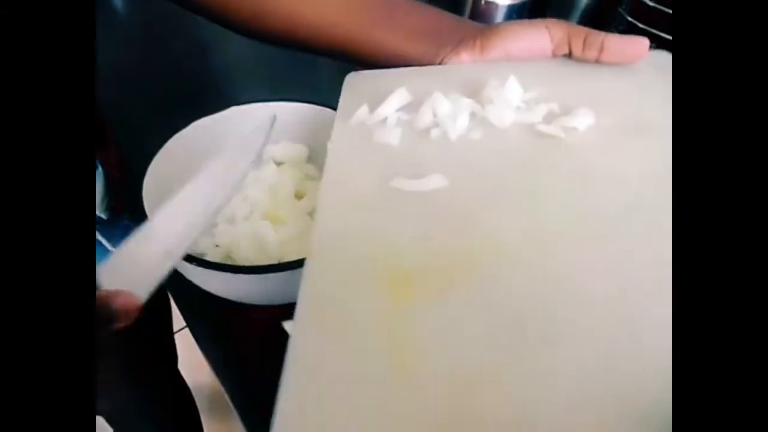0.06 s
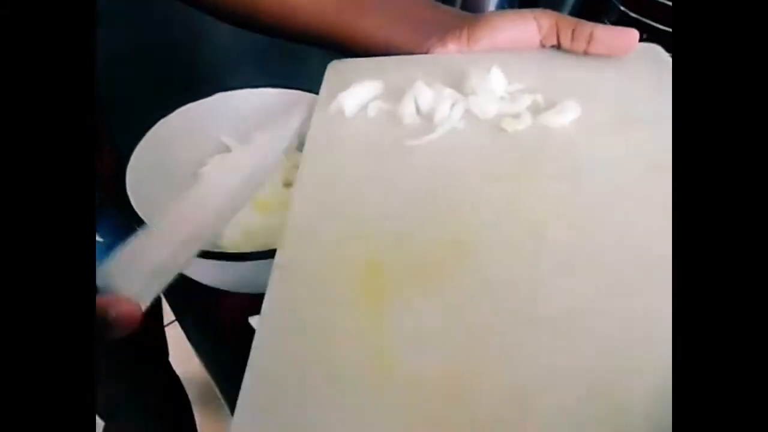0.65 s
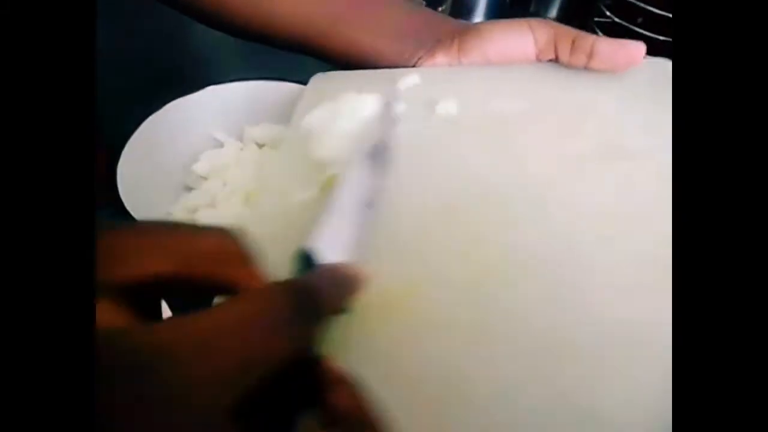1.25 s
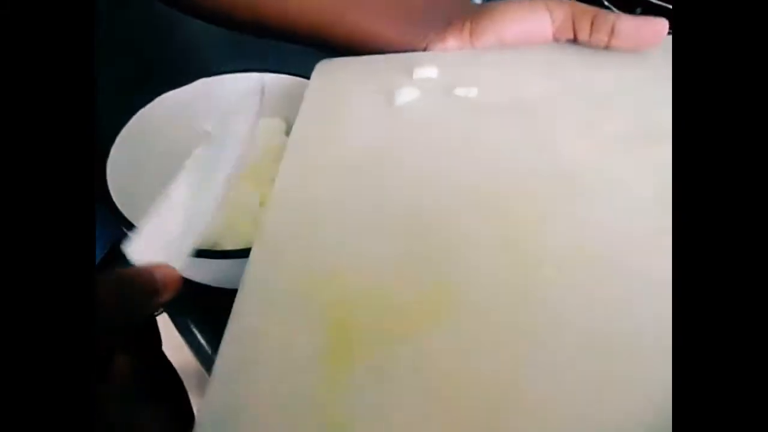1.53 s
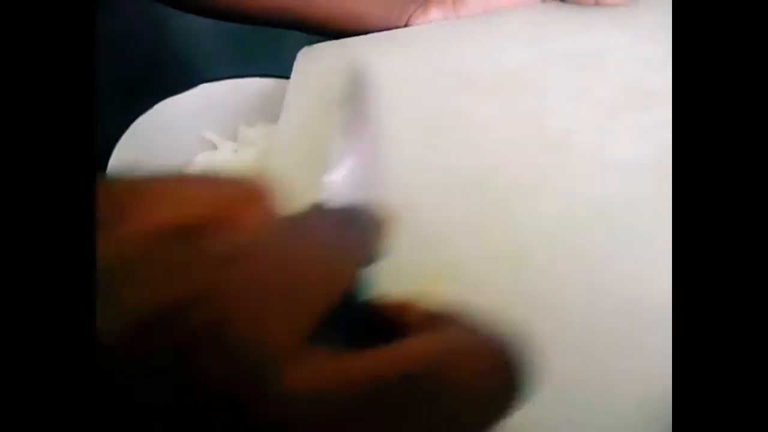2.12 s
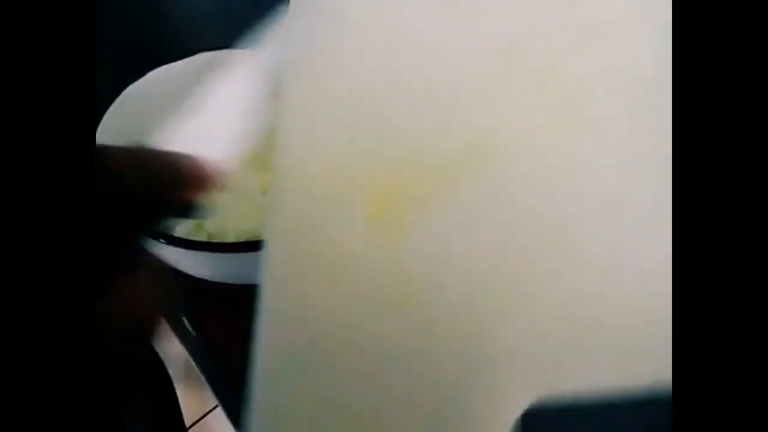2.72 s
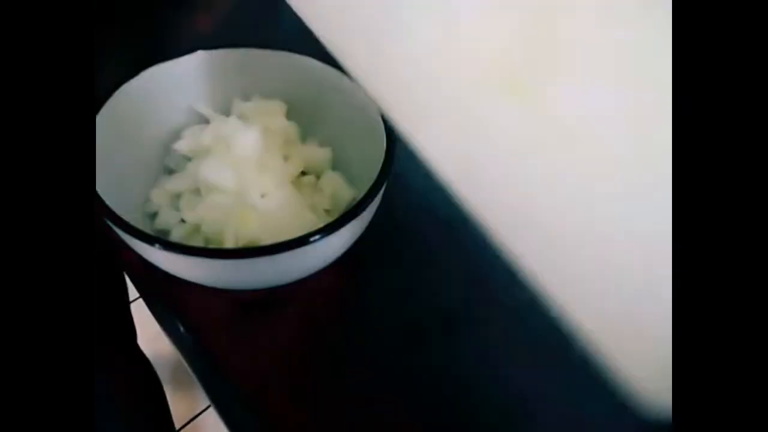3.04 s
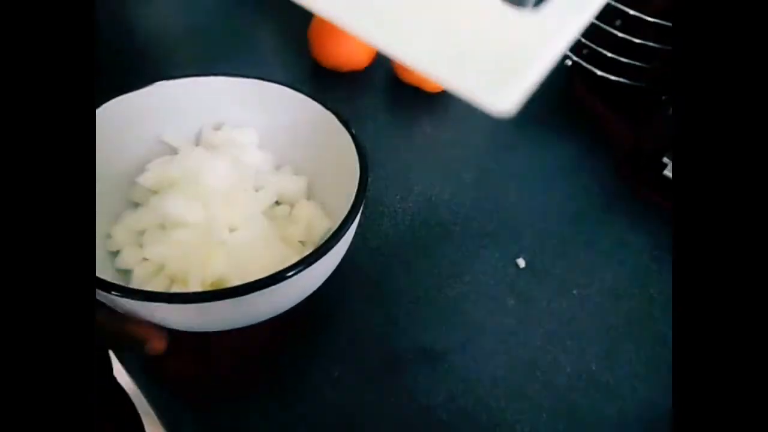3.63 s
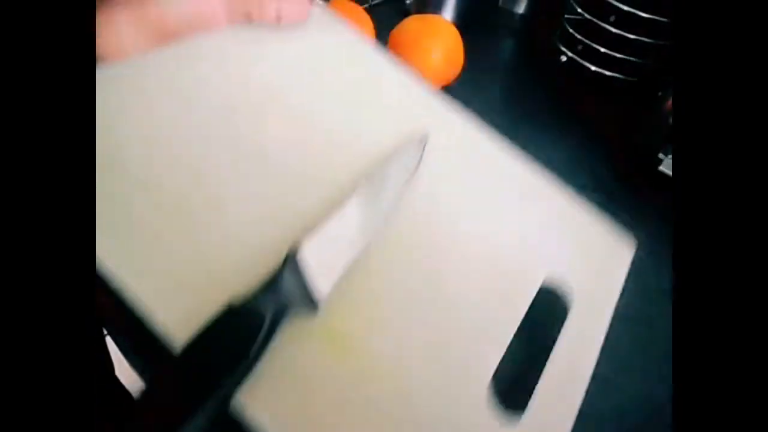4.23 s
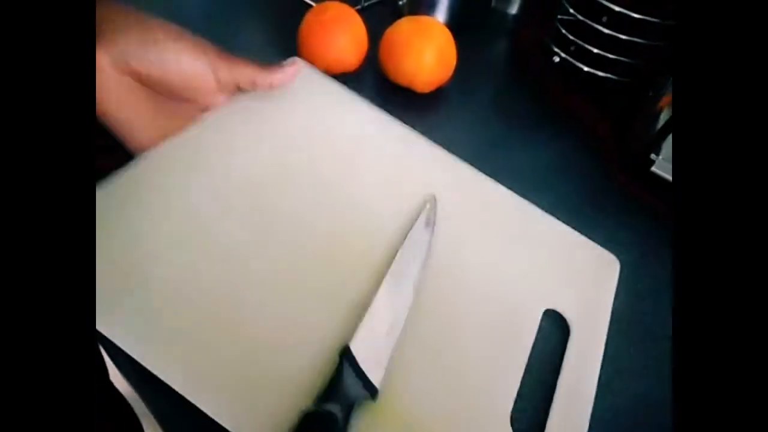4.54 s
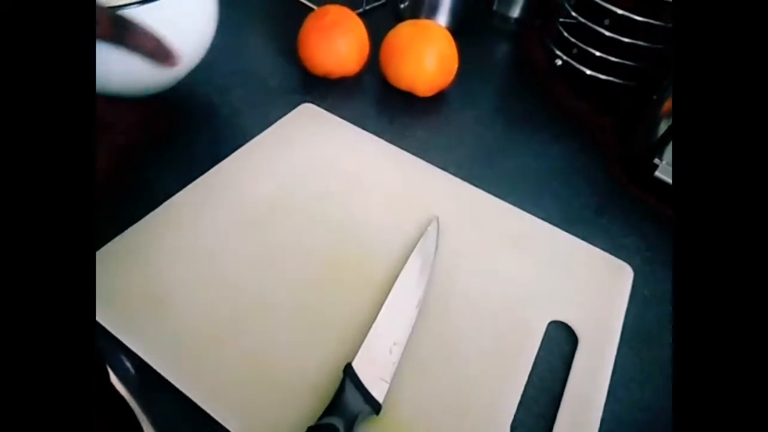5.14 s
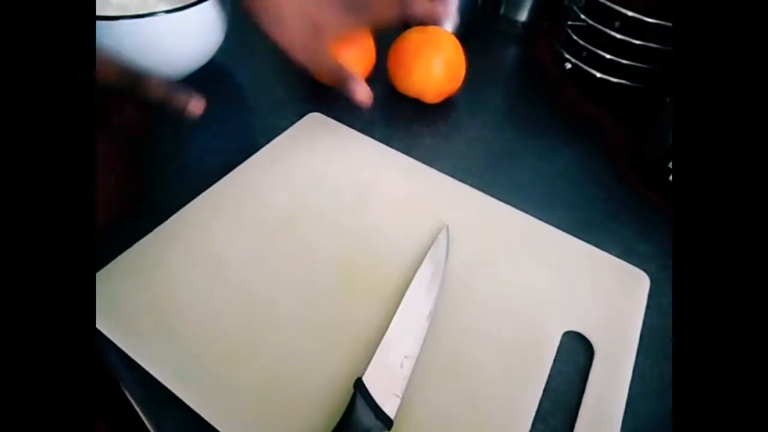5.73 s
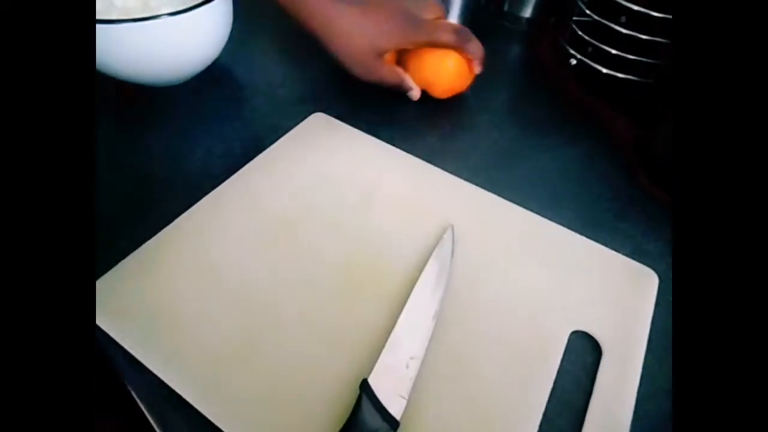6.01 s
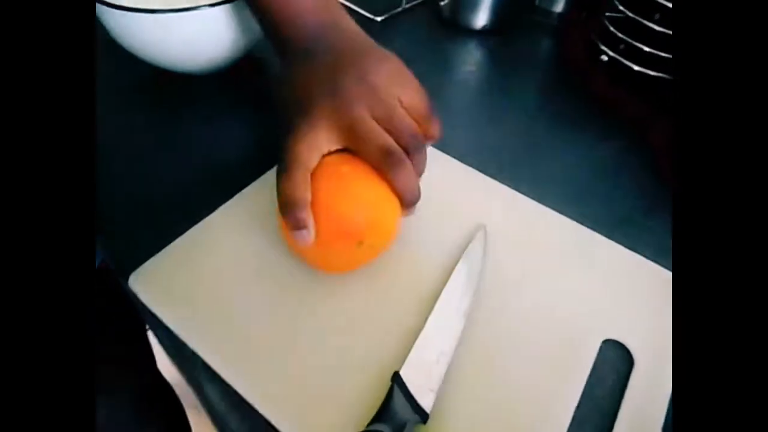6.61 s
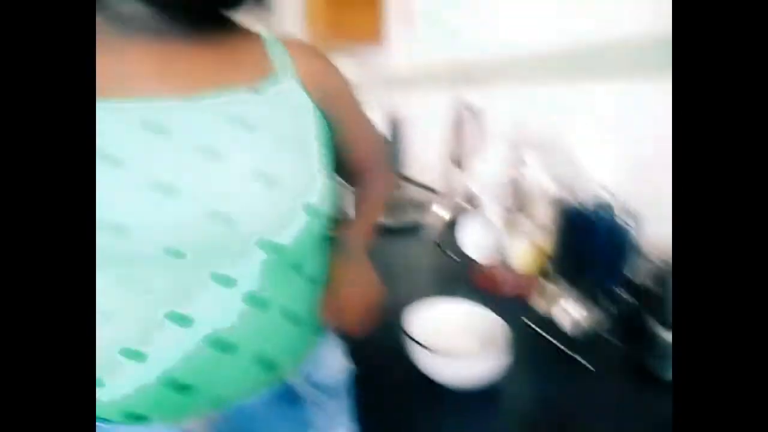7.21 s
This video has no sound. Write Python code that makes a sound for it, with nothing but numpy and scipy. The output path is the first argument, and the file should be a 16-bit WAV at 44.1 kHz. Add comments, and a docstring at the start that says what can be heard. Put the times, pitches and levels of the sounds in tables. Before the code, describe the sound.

In a small kitchen, a steel knife taps a plastic cutting board and scrapes diced onion off it in short strokes, the blade ringing twice. The board and knife then clack down on the counter, and a bowl lands with a soft thud. Near the end an orange slaps the board against the worktop, the loudest sound. The microphone is close, with faint room noise underneath.

```python
"""A small kitchen, microphone close to a hand-held plastic cutting board. A steel knife taps the board and
scrapes diced onion off it into a bowl; twice the blade rings free. Board and knife clack down on the counter,
the bowl is set down and nudged, and oranges slap the board onto the worktop. The room answers and a faint hiss
slides in pitch. The background sinks and returns as the recorder's automatic gain ducks and recovers, a rubbing
swells it just before the oranges land, and the loudest blow overloads the microphone."""
import sys
import numpy as np
from scipy import signal
from scipy.fft import rfft, irfft, next_fast_len
from scipy.io import wavfile
from scipy.ndimage import uniform_filter1d, map_coordinates

SR = 44100
rng = np.random.default_rng(int(sys.argv[2]) if len(sys.argv) > 2 else 0)


def waveform_to_disk(signal):
    """Save audio, clipped to [-1, 1], as 16-bit WAV at the path in sys.argv[1]."""
    frames = np.transpose(np.atleast_2d(signal))
    scaled = np.clip(frames, -1, 1) * 32767
    samples = np.round(scaled).astype(np.int16)
    wavfile.write(sys.argv[1], SR, samples)


N = 320166
TIME = np.arange(N) / SR

# knife on the held board: t/s, level/dB, bass/dB, treble/dB, t60/s
KNIFE_TAPS = [(0.079, -24, -6.5, -9, 0.034), (0.0825, -24.5, 3, -14.5, 0.08),
              (0.52, -24, 15.5, -17.5, 0.02), (0.5635, -25.5, 11.5, 0, 0.013), (1.109, -31, 4, 12, 0.09),
              (1.117, -13, -10, -6.5, 0.016), (1.647, -21.5, -3, 5.5, 0.12), (2.0392, -15, -6, -7.5, 0.02),
              (2.722, -23, -2.5, -1, 0.028)]
# body of the held board: f/Hz, level/dB
BOARD_BODY = [(50, -17.5), (160, -12), (220, -18), (330, -2), (550, -3), (780, -0.5), (1000, -8),
              (1400, -17.5), (1850, -12.5), (2600, -19), (3500, -25), (5300, -26), (10000, -36.5),
              (16000, -47.5)]
# pushes of the blade: t/s, length/s, board drone/dB, edge rasp/dB, wet hiss/dB, mid-push swell/dB
PUSHES = [(0.0, 0.03, -39.5, -38, -46, 1), (0.033, 0.012, -38, -37, -42.5, 2),
          (0.099, 0.036, -37.5, -40, -45.5, 2.5), (0.563, .057, -24.5, -28.5, -32, 4),
          (0.621, 0.11, -26, -25, -26, 9), (1.121, 0.047, -36, -40.5, -45, 1),
          (1.175, 0.19, -30, -38, -40, 7.5), (2.109, .061, -29, -30.5, -42, 4),
          (2.191, .16, -34, -37, -41.5, 5.5), (2.736, 0.12, -41.5, -40, -43.5, 4.5),
          (2.836, 0.0087, -41, -43.5, -44, 2)]
# the three colours of a scrape: f/Hz, level/dB
BOARD_DRONE = [(120, -32), (230, -17), (335, -6.5), (410, -7), (490, 1), (560, 0.5), (630, 1), (690, -1.5),
               (770, 5), (850, -2.5), (1000, -8.5), (1400, -26.5), (3000, -59)]
EDGE_RASP = [(500, -35.5), (1050, 3), (1400, 0), (1660, 3.5), (1950, -2), (2400, -5), (3100, -14),
             (4200, -16), (6500, -37.5), (12000, -54)]
WET_HISS = [(1700, -35), (2600, -6), (3150, 6.5), (3900, 3), (5400, 2), (6300, -4), (7400, 1), (8600, -3),
            (10300, -3), (13000, -7.5), (16000, -15.5)]
# the blade springs free: t/s, level/dB, tilt/(dB per octave), twin strength 0-1
BLADE_RELEASES = [(0.078, -27.5, -1.5, .35), (1.649, -29, 3, .95)]
# its bending modes, each with a close twin: f/Hz, level/dB, t60/s, twin offset/Hz, twin share 0-1
BLADE_MODES = [(1231, -1, .85, 6.8, .7), (3035, -7, .55, 9, .15), (5337, -4, .2, 11, .3),
               (5344, -19, .55, 11, .8), (8064, -12, .26, 20, .3), (11200, -28, .25, 25, .5),
               (14740, -34, .12, 40, .5)]

# board and knife clack on the counter: t/s, level/dB, bass/dB, treble/dB, t60/s, ring/dB
CLACKS = [(3.2537, -36.5, 8, -4, 0.022, 2.5), (3.2836, -48, 1, -1.5, 0.016, -15),
          (3.3239, -34, -0.5, -9.5, .036, -25), (4.4762, -44.5, 6.5, 2.5, 0.035, -2.5),
          (4.5291, -43, 1.5, -15, 0.072, 1), (4.5684, -46, 8, 6.5, .05, -6),
          (4.5914, -39, -3, -8, .17, -17.5), (4.883, -53.5, -12, -10, .053, -4),
          (4.9432, -26.5, -0.5, 12, .037, -0.5), (4.9507, -26, -8.5, 2.5, 0.027, -21),
          (4.9697, -28.5, 1, 10.5, 0.027, 1), (4.974, -28.5, 5, -15.5, .048, 2)]
# a pressed orange slaps the board flat, in a burst of contacts: columns as for CLACKS
ORANGE_SLAP = [(6.5688, -35.5, -3, -20, 0.019, -7.5), (6.5717, -6.5, -4, -18, 0.017, -10.5),
               (6.5775, -6, 1, 3.5, 0.018, -6), (6.5843, -17.5, 8.5, -6, 0.042, -4.5),
               (6.5876, -16.5, 4.5, -5, .025, -4.5)]
# the board rocks softly on the counter: t/s, level/dB
BOARD_ROCKS = [(3.3544, -53.5), (4.485, -49), (4.7069, -51), (4.9208, -47), (6.9895, -50), (7.0082, -51.5),
               (7.188, -57.5)]
# tone of each rock: bass/dB, treble/dB, t60/s, ring/dB
ROCK_TONE = (6, -12, 0.3, 7.5)
# body of the counter: f/Hz, level/dB
COUNTER_BODY = [(40, -11), (70, -7.5), (200, -7), (340, -3), (500, -7), (700, -9), (960, -1.5),
                (1300, -7.5), (1650, -5), (2150, -7), (3000, -11), (5500, -15), (10500, -16), (16000, -34)]
# hollow notes of the board, and the longer ring of the knife lying on it: f/Hz, level/dB, t60/s
BOARD_AND_KNIFE_MODES = [(174, -24, 0.29), (306, -15, 0.015), (873, -28, 0.47), (860, 0.5, 0.015),
                         (961, 6.5, 0.032), (1067, -12, 0.046), (1495, -17, 0.22), (1643, -23.5, 0.33),
                         (2280, -12.5, 0.053)]
# the full bowl lands and rocks: t/s, level/dB, bass/dB, treble/dB, t60/s
BOWL_THUDS = [(5.4625, -32.5, 1, -2.5, 0.059), (5.467, -34.5, 2, 4.5, 0.095), (5.509, -41, 4.5, -1.5, 0.31),
              (5.618, -40.5, 6.5, -2.5, 0.49)]
# bodies of the bowl and of a hard edge: f/Hz, level/dB
BOWL_BODY = [(40, -12), (65, -13), (100, -10.5), (160, 1.5), (250, -6), (430, 5.5), (600, 1), (1000, 0),
             (1400, -6.5), (1900, -19.5), (4000, -31.5), (15000, -36)]
EDGE_BODY = [(500, -45), (3000, -14), (7000, -2.5), (11000, -10.5), (15000, -3.5)]
# hard edges meet; fingers brush the fruit: t/s, level/dB
EDGE_TICKS = [(3.2534, -32.5), (4.9442, -38.5), (6.9895, -58)]
FINGER_BRUSHES = [(5.955, -61), (6.036, -57.5), (6.13, -54.5)]
# tone of a tick and of a brush: bass/dB, treble/dB, t60/s
TICK_TONE = (1.8, -2, 0.0044)
BRUSH_TONE = (-11, 12, .04)

# decay of the kitchen: f/Hz, t60/s
ROOM_DECAY = [(80, 0.83), (300, 0.24), (1500, 0.57), (4000, 0.52), (10000, 0.4), (16000, 0.93)]
# colour coming back off the walls: f/Hz, level/dB
WALL_COLOUR = [(60, 9), (500, 1.5), (1500, -2), (4000, 1), (10000, -3), (15000, -10)]
# faint falling hisses: t/s, length/s, starting f/Hz, level/dB
HISS_SLIDES = [(0.168, 0.33, 4200, -55), (0.822, 0.39, 4070, -54), (1.38, 0.21, 3920, -56.5),
               (1.518, 0.32, 4350, -58), (1.771, 0.3, 3960, -58), (2.263, 0.34, 3960, -63)]
# the background as the recorder's automatic gain ducks and recovers, with a rubbing swell at 6.0-6.55 s: t/s,
# level/dB
BACKGROUND_LEVEL = [(0.0, -44), (0.38, -45), (0.64, -42), (1.27, -44), (1.41, -44.5), (2.2, -47), (2.38, -55.5),
                    (2.87, -56), (3.72, -77.5), (4.51, -63.5), (4.67, -58), (4.99, -53), (5.24, -61),
                    (5.5, -68.5), (5.64, -57.5), (6.01, -52), (6.33, -43.5), (6.55, -44.5), (6.83, -62),
                    (7.26, -61.5)]
# three layers of the background: f/Hz, level/dB
ROOM_RUMBLE = [(20, -4), (45, -4), (68, 5.5), (90, -3.5), (125, 0.5), (160, -8.5), (220, -5), (270, -3.5),
               (335, 2.5), (390, -14.5), (600, -56.5)]
ROOM_AIR = [(250, -20), (400, 1), (560, 3), (1000, -3), (1500, -10), (2200, -15.5), (3500, -19),
            (8000, -53)]
ROOM_FIZZ = [(1500, -22), (3500, 4), (6000, 4), (10000, 0), (16000, -5)]


def blows(contacts, body, shudder):
    """Each contact gives a body one impulse and a shudder of dense plate modes."""
    out, t = np.zeros(N), np.arange(SR // 4) / SR
    span = 0.01 * SR  # a contact's level is its energy spread over 10 ms
    for start, db, bass_db, treble_db, t60, *_ in contacts:
        force = rng.standard_normal(len(t)) * amp(-60 * t / t60)
        force *= shudder / np.linalg.norm(force)
        force[0] += 1
        hit = coloured(force, body, [(400, bass_db), (800, 0.0063), (1400, 0.0075), (7000, treble_db)])
        add(out, start, amp(db) * hit * np.sqrt(span) / np.linalg.norm(hit))
    return out


def scraping():
    """The edge catches on scored plastic: coarse slips drive the board, fine ones rasp and hiss."""
    coarse, fine = slips(per_s=1100, spread_db=1.5), slips(per_s=3100, spread_db=1.5)
    drone = unit(coloured(coarse, BOARD_DRONE))
    rasp = travelling_contact(coloured(0.5 * coarse + fine, EDGE_RASP), depth_db=3.0)
    hiss = travelling_contact(coloured(0.44 * coarse + fine, WET_HISS), depth_db=3.0)
    pressure = amp(wobble(130))
    out = np.zeros(N)
    for start, length, drone_db, rasp_db, hiss_db, swell_db in PUSHES:
        # a push brightens as the blade travels
        out += drone * amp(drone_db) * push(start, length, swell_db, drift_db_per_s=-28)
        out += rasp * amp(rasp_db) * push(start, length, swell_db, drift_db_per_s=1.5)
        out += hiss * amp(hiss_db) * push(start, length, swell_db, drift_db_per_s=13.5)
    return out * pressure


def slips(per_s, spread_db):
    """Irregular stick-slip impulses of scattered size."""
    happens = rng.random(N) < per_s / SR
    sizes = amp(spread_db * np.clip(rng.standard_normal(N), -2, 2))
    return unit(happens * sizes * rng.choice([-1, 1], N))


def push(start, length, swell_db, drift_db_per_s, bite_s=0.016, lift_db_per_s=336.5):
    """Gain of one push: the edge bites, bears down midway, then lifts off."""
    t = np.clip(TIME - start, 0, None)
    held = np.minimum(t, length)
    db = swell_db * (np.sin(np.pi * held / length) - 1) + drift_db_per_s * (held - length / 2)
    return np.minimum(t / bite_s, 1) * amp(db - lift_db_per_s * (t - held))


def travelling_contact(x, depth_db):
    """As the contact travels along the edge, resonances come and go."""
    bands = signal.stft(x, nperseg=256)[2]
    patches = uniform_filter1d(rng.standard_normal(bands.shape), size=4, axis=0)
    patches = uniform_filter1d(patches, size=8, axis=1)
    return unit(signal.istft(bands * amp(depth_db * unit(patches)), nperseg=256)[1][:N])


def blade_ring():
    """Twin modes of the steel beat together, and the ring wavers as the knife swings."""
    out, t = np.zeros(N), np.arange(SR) / SR
    for start, db, tilt_db, twin_strength in BLADE_RELEASES:
        for hz, mode_db, t60, offset_hz, share in BLADE_MODES:
            onset_db = db + mode_db + tilt_db * np.log2(hz / BLADE_MODES[0][0])
            swing = wobble(33, size=SR)
            mode = np.sin(2 * np.pi * hz * t + 0.15 * swing)
            twin = twin_strength * share * np.sin(2 * np.pi * (hz + offset_hz) * t)
            add(out, start, amp(onset_db + swing - 60 * t / t60) * (mode - twin))
    return out


def board_on_counter(contacts, shudder, attack_s):
    """Each knock sounds the counter, the board and the knife on it; a soft one spares the upper modes."""
    knocks = blows(contacts, COUNTER_BODY, shudder)
    ring, t = np.zeros(N), np.arange(SR // 4) / SR
    hz, mode_db, t60 = np.transpose(BOARD_AND_KNIFE_MODES)[:, :, None]
    for start, db, _, treble_db, _, ring_db in contacts:
        scatter_db, detune = rng.standard_normal((2, len(hz), 1))
        onset_db = mode_db + scatter_db + along([(1000, 0.02), (5000, treble_db)], hz)
        modes = amp(onset_db - 60 * t / t60) * np.sin(2 * np.pi * hz * (1 + 0.027 * detune) * t)
        add(ring, start, amp(db + ring_db) * modes.sum(axis=0) * (1 - np.exp(-t / attack_s)))
    return knocks + ring


def small_touches():
    """Hard edges meet with a bright tick, and fingers brush the fruit."""
    ticks = blows(with_tone(EDGE_TICKS, TICK_TONE), EDGE_BODY, shudder=2.1)
    return ticks + blows(with_tone(FINGER_BRUSHES, BRUSH_TONE), COUNTER_BODY, shudder=4)


def diffuse_field(x, size=256):
    """The room stores energy in each band and leaks it back as noise."""
    hz, t, bands = signal.stft(x, SR, nperseg=size)
    kept_per_frame = amp(-120 * t[1] / along(ROOM_DECAY, hz))
    energy = np.array([signal.lfilter([0, 1 - kept], [1, -kept], np.abs(band) ** 2)
                       for kept, band in zip(kept_per_frame, bands)])
    diffuse = signal.stft(rng.standard_normal(N), nperseg=size)[2]
    tail = diffuse / np.std(diffuse) * np.sqrt(energy) * amp(along(WALL_COLOUR, hz))[:, None]
    return signal.istft(tail, nperseg=size)[1][:N]


def wall_reflections(x):
    """Walls and cupboards return a tail in which some notes linger more than others."""
    hz, t, bands = signal.stft(rng.standard_normal(SR), SR, nperseg=256)
    tail_db = along(WALL_COLOUR, hz)[:, None] - 60 * t / along(ROOM_DECAY, hz)[:, None]
    tail = signal.istft(bands * amp(tail_db), SR, nperseg=256)[1]
    return signal.fftconvolve(x, tail / np.linalg.norm(tail))[:N]


def sliding_hiss(half_width_hz=300, fall_hz_per_s=1500):
    """Faint behind the knife, a narrow hiss swells and fades while its pitch falls."""
    out, lowpass = np.zeros(N), signal.butter(2, half_width_hz, fs=SR, output="sos")
    for start, length, hz, db in HISS_SLIDES:
        t = TIME[:round(length * SR)]
        band = unit(signal.sosfilt(lowpass, rng.standard_normal(SR)))[:len(t)]
        carrier = np.sqrt(2) * np.sin(2 * np.pi * (hz - fall_hz_per_s * t / 2) * t)
        add(out, start, amp(db) * np.sin(np.pi * t / length) * band * carrier)
    return out


def background(usual_db=-45):
    """Rumble, air and fizz sink and return as the recorder's automatic gain ducks and recovers, and swell with
    a rubbing just before the oranges land."""
    gain_db = np.interp(TIME, *np.transpose(BACKGROUND_LEVEL)) - usual_db
    rumble = noise(ROOM_RUMBLE) * amp(-42.5 + 0.9 * gain_db + 0.44 * wobble(6))
    air = noise(ROOM_AIR) * amp(-47.5 + 1.028 * gain_db + 0.88 * wobble(48))
    fizz = noise(ROOM_FIZZ) * amp(-60.5 + gain_db)
    return rumble + air + fizz


def amp(db):
    """Decibels to gain."""
    return 10 ** (np.asarray(db) / 20)


def unit(x):
    """Scale to rms 1."""
    return x / np.sqrt(np.mean(x ** 2) + 1e-20)


def along(points, hz):
    """Read (f/Hz, value) points on a log frequency axis."""
    f, values = np.transpose(points)
    return np.interp(np.log(hz + 1), np.log(f), values)


def wobble(rate, size=N):
    """A smooth random curve, rate knots a second."""
    return map_coordinates(rng.standard_normal(int(size * rate / SR) + 4), [TIME[:size] * rate])


def coloured(x, *spectra, size=4096):
    """Pass x through a causal body whose gain is the product of the spectra."""
    hz = np.fft.rfftfreq(size, 1 / SR)
    gain = amp(sum(along(spectrum, hz) for spectrum in spectra))
    cepstrum = irfft(np.log(gain))
    cepstrum[1:size // 2] *= 2  # fold to minimum phase
    cepstrum[size // 2 + 1:] = 0
    return signal.fftconvolve(x, irfft(np.exp(rfft(cepstrum))))[:len(x)]


def noise(spectrum):
    """Coloured noise of rms 1."""
    return unit(coloured(rng.standard_normal(N), spectrum))


def add(track, start, sound):
    """Mix a sound in at start seconds."""
    part = track[max(0, round(start * SR)):][:len(sound)]
    part += sound[:len(part)]


def with_tone(contacts, tone):
    """Give every (t/s, level/dB) contact the same colour and decay."""
    return [(*contact, *tone) for contact in contacts]


def scene():
    """At the microphone, in mono: knife work is close and fairly dry; the bowl carries the most room."""
    taps = blows(KNIFE_TAPS, BOARD_BODY, shudder=1.0)
    scrapes = scraping()
    contacts = list(CLACKS) + with_tone(BOARD_ROCKS, ROCK_TONE)
    knocks = board_on_counter(contacts, shudder=1.7, attack_s=0.001)
    slap = board_on_counter(ORANGE_SLAP, shudder=1.5, attack_s=0.0018)
    bowl = blows(BOWL_THUDS, BOWL_BODY, shudder=2.5)
    touches = small_touches()
    direct = taps + blade_ring() + scrapes + knocks + slap + bowl + touches
    into_room = (amp(-13.5) * taps + amp(-13) * scrapes + amp(-11.5) * knocks
                 + amp(-19.5) * slap + amp(-3.5) * bowl + amp(-23.5) * touches)
    reverb = (diffuse_field(into_room) + wall_reflections(into_room)) / np.sqrt(2)
    return (direct + reverb + sliding_hiss() + background())[None]


def record(dry):
    """The close microphone flattens the highest peaks and keeps nothing above its band limit."""
    ceiling, top_hz = 0.66, 16100
    flattened = dry / (1 + np.abs(dry / ceiling) ** 6) ** (1 / 6)
    size = next_fast_len(N + SR // 2)
    in_band = np.fft.rfftfreq(size, 1 / SR) < top_hz
    return irfft(rfft(flattened, size) * in_band, size)[:, :N]


dry = scene()
out = record(dry)
waveform_to_disk(out)
```